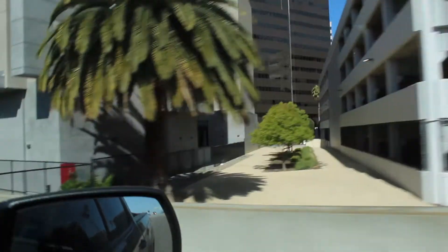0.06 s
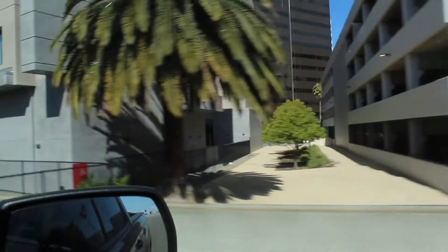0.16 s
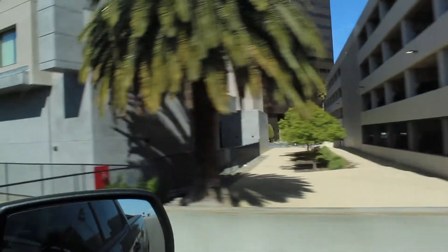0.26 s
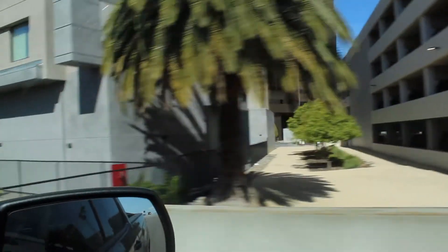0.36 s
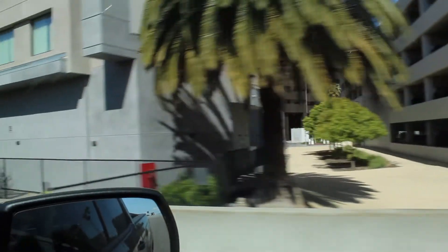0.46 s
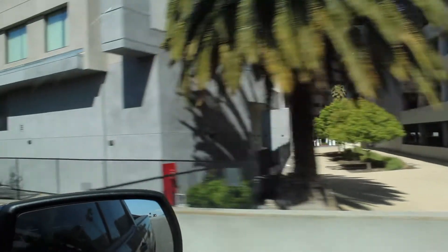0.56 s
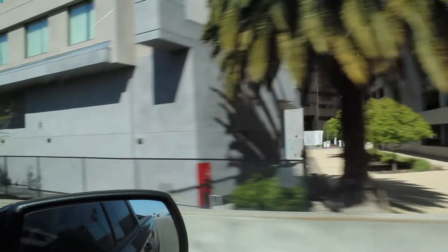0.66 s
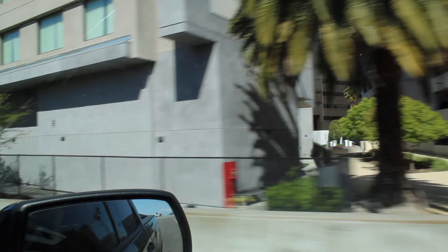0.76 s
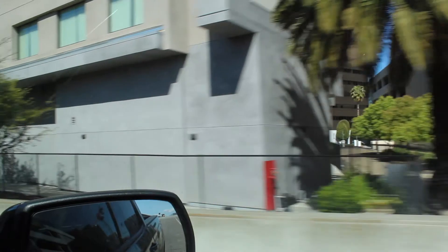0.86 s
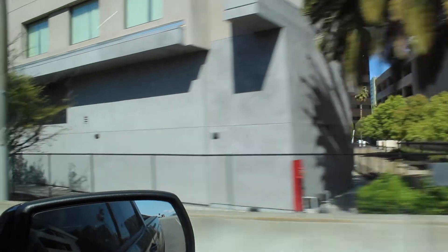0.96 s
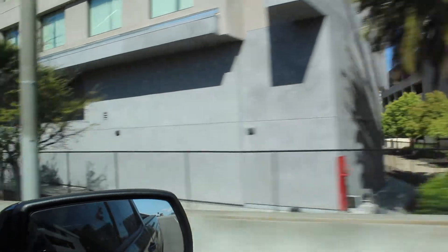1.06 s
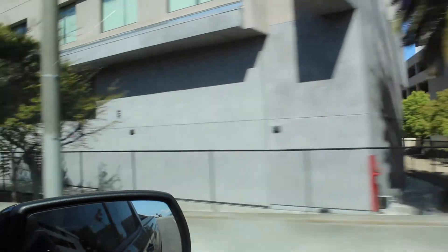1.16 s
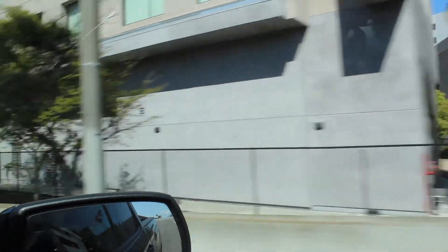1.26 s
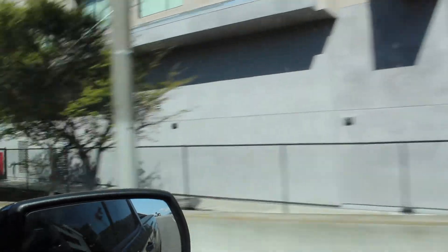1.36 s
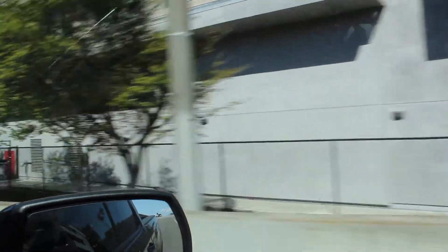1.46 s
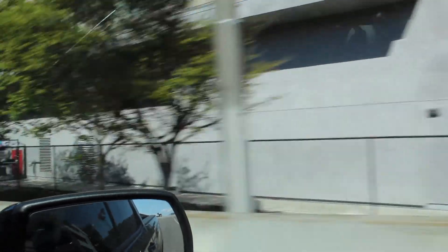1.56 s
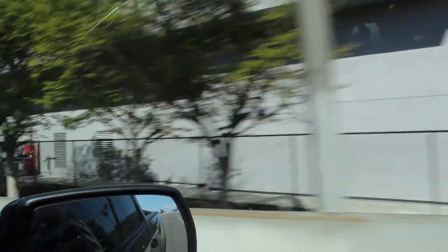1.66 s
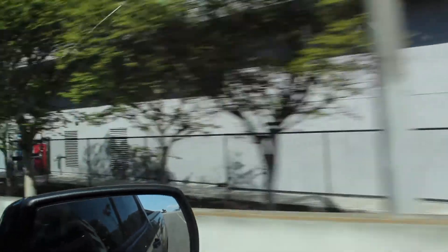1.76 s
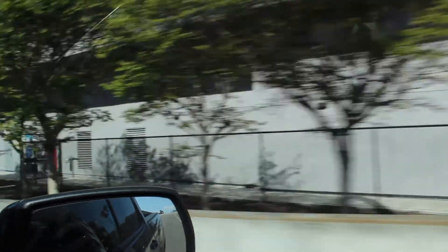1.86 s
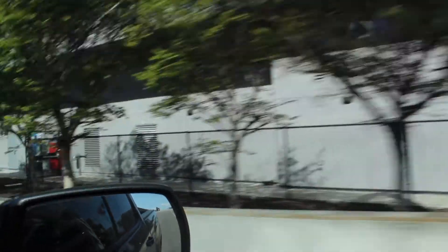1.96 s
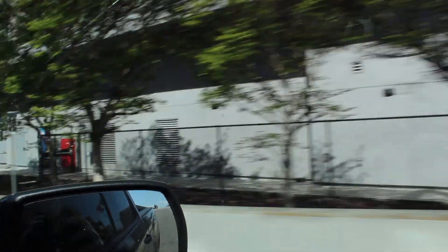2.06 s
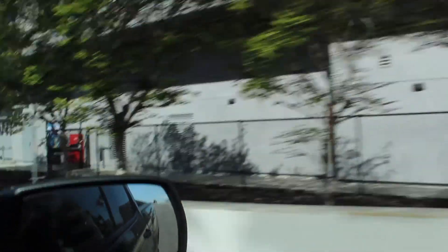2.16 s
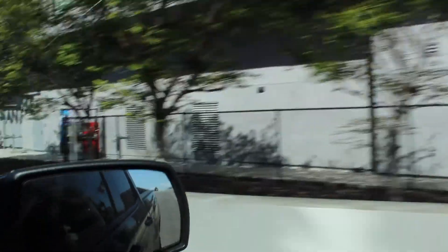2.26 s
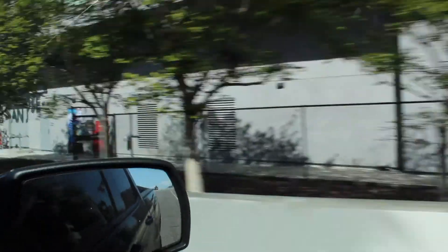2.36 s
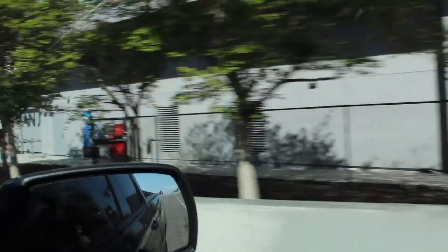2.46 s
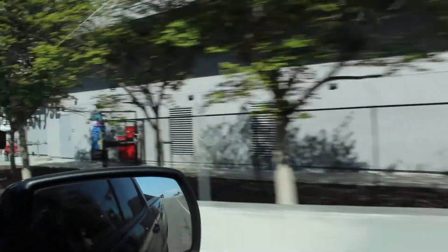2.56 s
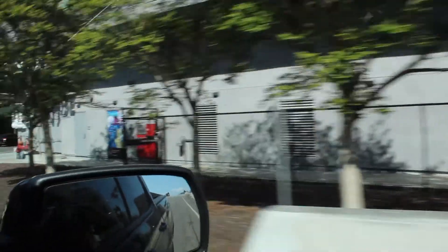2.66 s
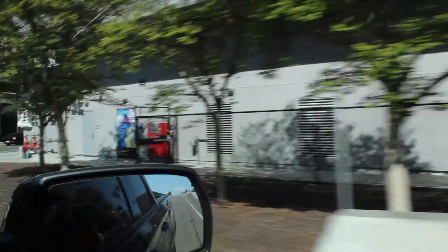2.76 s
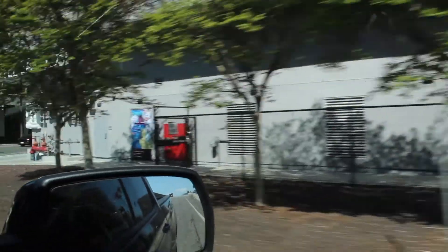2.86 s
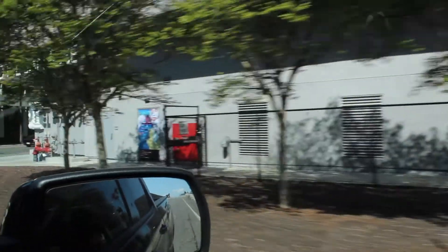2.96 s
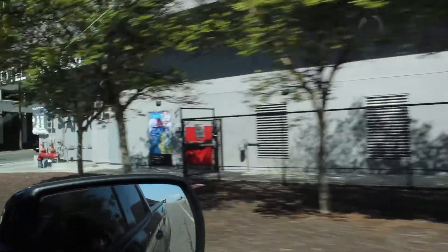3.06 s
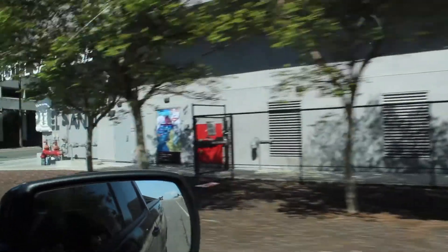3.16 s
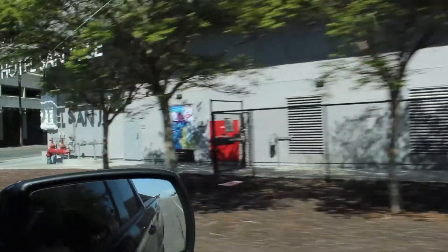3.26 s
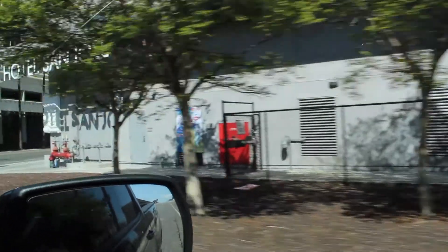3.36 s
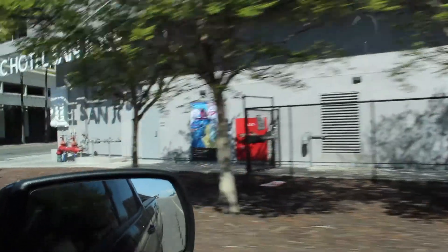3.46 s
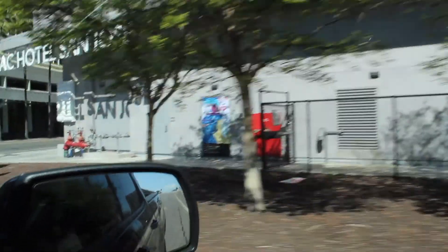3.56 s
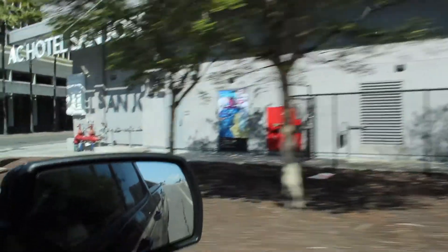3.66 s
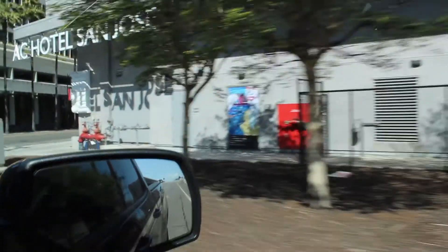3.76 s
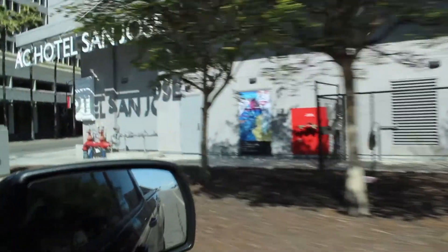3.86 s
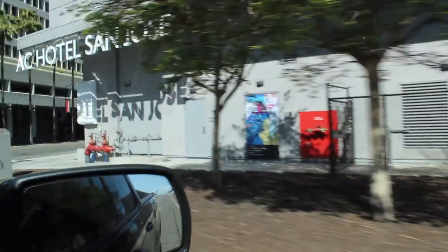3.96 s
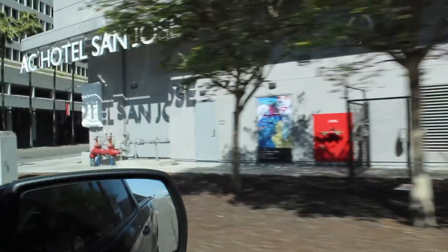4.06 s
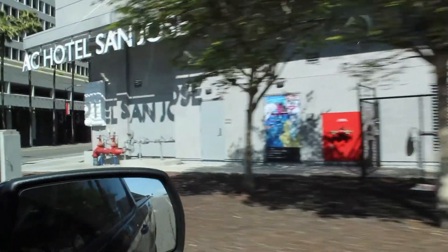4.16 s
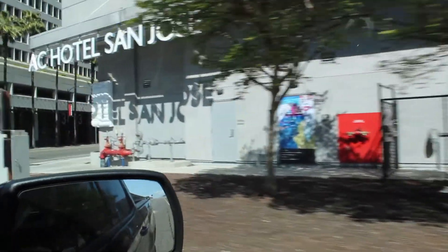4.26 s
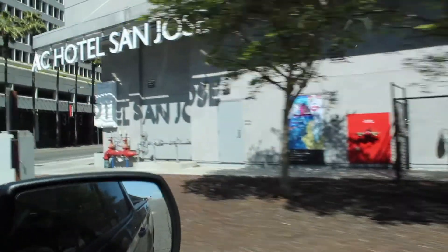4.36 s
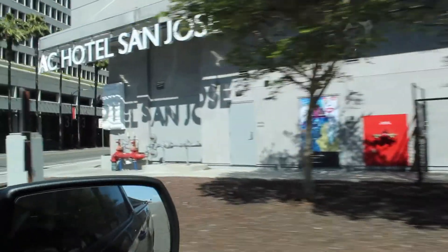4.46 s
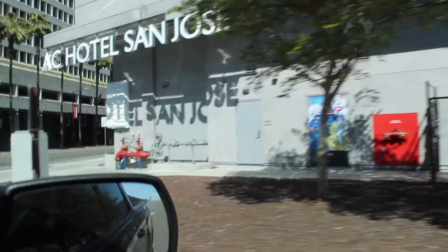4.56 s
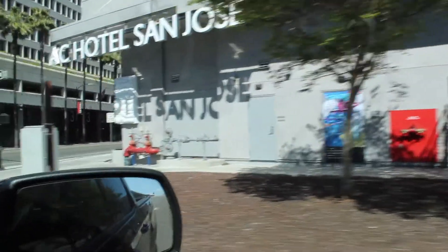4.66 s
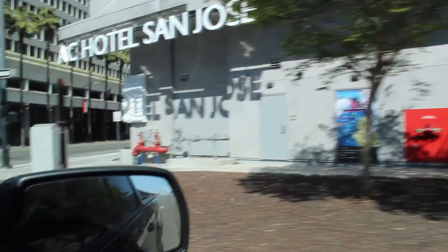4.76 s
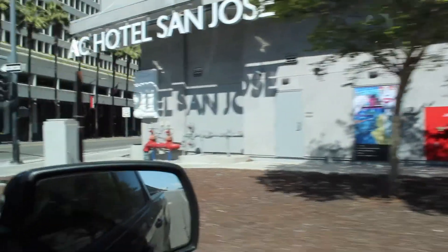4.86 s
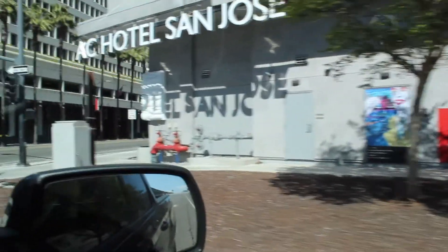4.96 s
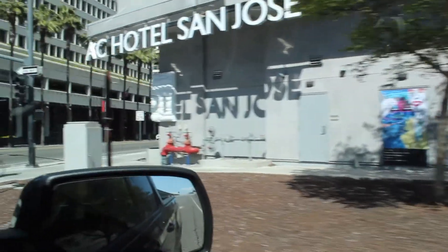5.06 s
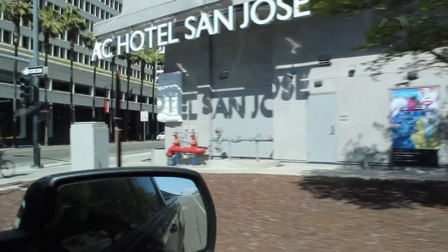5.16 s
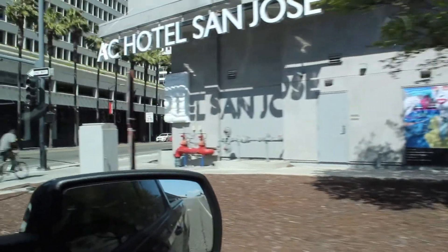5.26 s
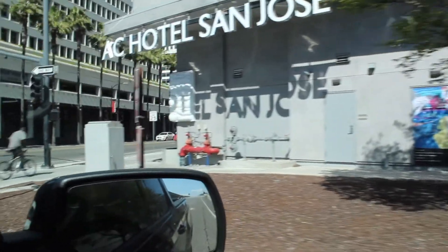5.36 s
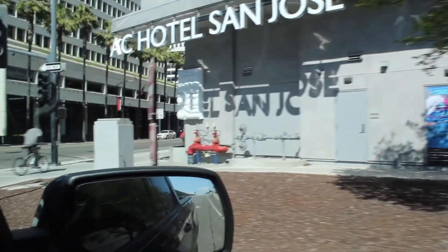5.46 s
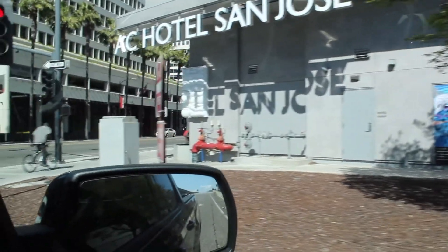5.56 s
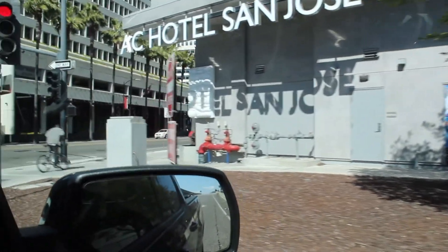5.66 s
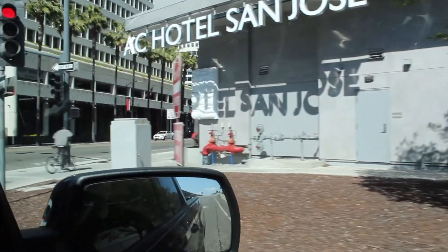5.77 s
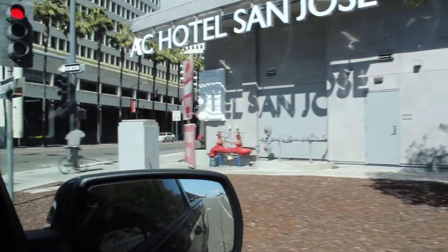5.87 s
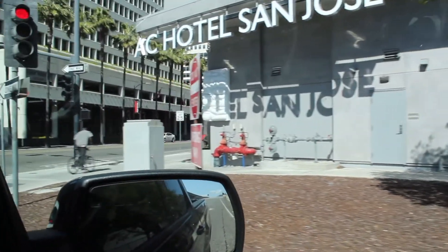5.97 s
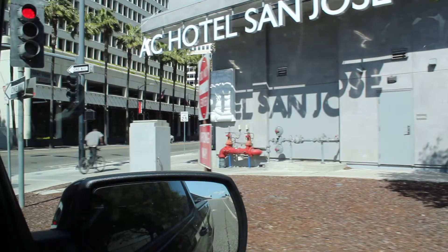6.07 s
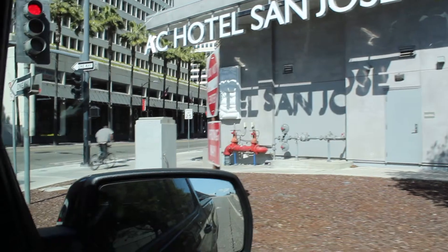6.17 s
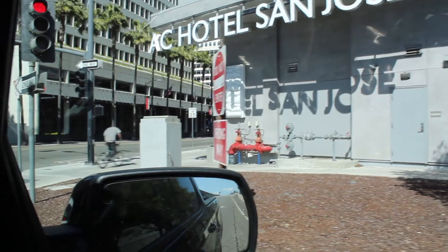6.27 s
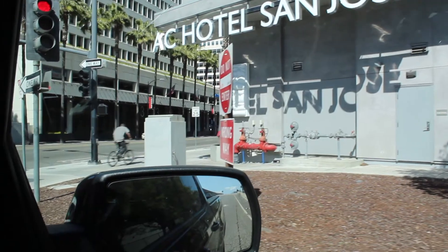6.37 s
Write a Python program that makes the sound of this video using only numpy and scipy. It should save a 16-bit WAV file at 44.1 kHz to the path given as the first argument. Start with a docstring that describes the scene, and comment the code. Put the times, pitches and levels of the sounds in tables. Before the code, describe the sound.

The sound is heard inside a closed car slowing on a city street, from beside the side window. It opens with a deep, booming road rumble, soft thumps from bumps and a muffled tyre roar, over a steady rush of air vents and a low engine hum. Light brushes on plastic come in the first half second, and faint trim ticks are scattered through the first five seconds. A small knock falls at 0.8 seconds, and a soft tyre hiss swells and passes around 1.3. Hard plastic snaps sharply at 2.4. A low drone swells around 3 seconds, with a knock on a trim panel. A lighter knock follows at 3.9 and a quick double click at 4.1. The rumble then ebbs as the car slows to a crawl, leaving mostly hum and vents. A faint, brief brake whine sounds at about 6 seconds.

```python
"""Inside a car that slows down on a city street, windows shut.
The road forces the body and the cabin air to vibrate in their normal modes: a low boom that ebbs with
the roar of the tyres, leaving the engine's harmonic hum and the rushing air vents. Close by, something
brushes lightly on plastic, and plastic parts tick, knock, snap and click in damped free vibration.
Just before the stop, friction draws a faint whine from the brakes."""
import sys
import numpy as np
from scipy import signal
from scipy.fft import rfft, irfft, next_fast_len
from scipy.io import wavfile
from scipy.ndimage import uniform_filter1d

SR = 44100
rng = np.random.default_rng(int(sys.argv[2]) if len(sys.argv) > 2 else 0)


def materialize(psi):
    """Save the field psi as 16-bit PCM at rate SR to the path in sys.argv[1].

    A 1-D psi becomes a single channel; in a 2-D psi each row is a channel.
    """
    bounded = np.clip(np.atleast_2d(psi).T, -1, 1)
    quanta = np.round(bounded * 32767).astype(np.int16)
    wavfile.write(sys.argv[1], SR, quanta)


N = 282945
TIME = np.arange(N) / SR

# the slowing of the car: time_s, speed_ratio (to the starting speed)
CAR_SPEED = [(0, 0.98), (1.2, 0.86), (2, 0.75), (3.25, 0.55), (4, 0.38), (5, 0.27), (5.55, .2),
             (6.42, 0.061)]
# bumps; a long one heaves the body, a short one booms in the cabin: time_s, level_db, centre_hz
ROAD_BUMPS = [(0.11, -14.5, 38), (0.32, -12.5, 46.5), (0.48, -22, 38), (0.71, -25, 40), (0.93, -21, 70),
              (1.359, -17.5, 124), (1.429, -16.5, 38), (1.559, -18.5, 76), (1.66, -22, 38.2),
              (1.921, -17, 38), (2.04, -13.5, 38.2), (2.26, -17, 50.3), (2.47, -25, 45), (3.02, -23.5, 145),
              (3.33, -19, 42), (3.51, -20, 45), (3.64, -19, 41.6), (3.88, -25, 140), (4.10, -19.5, 64.4),
              (4.44, -20, 55.5), (4.90, -30.5, 42), (5.12, -36.5, 75), (5.47, -29, 42)]
# modes of the body on its springs and mounts: pitch_hz, width_hz, gain_db
SUSPENSION_MODES = [(24.1, 10, -5.5), (31.4, 3.6, -12.5), (41.2, 11.8, 3.5)]
# modes of the cabin air: pitch_hz, width_hz, fast_gain_db, crawling_gain_db
AIR_MODES = [(70.8, 11, -11.5, -15), (86.4, 13.5, -4, -5.5), (113.4, 24.7, -4, -2), (137.4, 27.3, -0.5, -5),
             (158.6, 22.5, -12.5, -8.5), (184.6, 35, -6, -7), (242.1, 52.7, -6.5, -11.5)]
# brief dips of the rumble and drone: middle_s, half_length_s, gain_db
RUMBLE_DIPS = [(1.16, 0.027, -1.5), (2.4, .012, -3.5), (2.55, 0.014, -5), (2.67, 0.018, -5.5),
               (3.406, 0.019, -7), (3.72, 0.015, -5.5), (5.152, 0.018, -4.5), (5.798, .03, -2.5)]
# the tyres' drone, swelling as the car slows through a resonance: time_s, level_db
DRONE_LEVELS = [(0, -44.5), (2.0, -35.5), (2.35, -31.5), (2.8, -21.5), (3.2, -21), (3.6, -32), (4.3, -32.5),
                (5.2, -62)]
# spectrum of tyre roar through doors and glass: frequency_hz, density_db
ROAR_SPECTRUM = [(100, -20.5), (290, 6.5), (370, 5), (470, 4), (590, -2), (730, 0), (930, -12),
                 (1150, -6.5), (1500, -26), (2000, -26.5), (2700, -29), (3450, -30.5), (3750, -37.5),
                 (5000, -39), (12000, -60.5)]
# stretches of coarse asphalt: middle_s, half_length_s, gain_db
COARSE_ASPHALT = [(0.074, 0.019, 3.5), (0.247, 0.027, 5.5), (0.79, 0.076, 5), (1.055, 0.036, 4.5)]
# harmonics of the engine's firing rate: harmonic_number, level_db
ENGINE_HARMONICS = [(1, -49), (2, -46.5), (3, -46.5), (4, -41.5), (5, -49), (6, -44)]
# spectrum of the air leaving the vents: frequency_hz, density_db
VENT_SPECTRUM = [(200, 0.5), (500, 3), (640, 0), (900, 1), (1500, -3.5), (2100, -3), (2700, -11.5),
                 (3450, -13), (3750, -19), (5000, -23.5), (6500, -29), (10000, -33.5), (12000, -40),
                 (15500, -46)]
# resonances of the air ducts: pitch_hz, width_hz, gain_db
DUCT_RESONANCES = [(296.5, 46, -51.5), (433, 24, -61), (509, 82, -51.5), (718, 73, -55), (1112, 180, -50),
                   (1779, 47, -62), (1957, 34, -64), (3230, 650, -63.5), (4625, 180, -73.5)]
# thin whistles of the blower: pitch_hz, width_hz, gain_db
BLOWER_WHISTLES = [(1086.5, 24, -56.5), (1786, 19, -65), (2066, 18, -59.5), (2826, 22, -68)]
# notes the cabin holds for a moment: middle_s, half_length_s, pitch_hz, level_db
BOOM_NOTES = [(0.117, .09, 195.2, -26), (0.244, .05, 85.2, -22), (.25, 0.037, 283.5, -27),
              (0.426, 0.062, 81.2, -24), (0.512, 0.1, 135.7, -19.5), (0.806, 0.057, 146.8, -22),
              (.95, .05, 82.4, -17), (1.268, 0.091, 140.9, -23.5), (2.302, 0.17, 70.4, -26),
              (2.87, 0.07, 78.2, -23.5), (3.274, 0.032, 137.2, -21.5), (4.83, .06, 76, -33.5),
              (5.4, 0.089, 72.1, -39)]
# short strokes on the plastic: peak_s, level_db, half_length_s
BRUSH_STROKES = [(0.132, -42.5, 0.0043), (.150, -56, .006), (0.32, -59, .004), (0.342, -48.5, 0.0038),
                 (0.366, -48, 0.0061), (0.389, -43, 0.0036), (.399, -56, .006), (2.073, -57.5, 0.012),
                 (3.905, -59.5, 0.04), (4.218, -64.5, 0.16), (4.773, -65, 0.09), (4.974, -67, .07),
                 (5.32, -72, .08), (5.66, -69, .08)]
# spectrum of their friction: frequency_hz, density_db
BRUSH_SPECTRUM = [(2000, -6), (4500, -1), (6500, -2), (7500, 0.5), (8600, 0), (10500, -0.5), (12500, -6),
                  (14500, -6), (16000, -18)]
# touches of loose trim as the car shakes: start_s, force_db
TRIM_TOUCHES = [(.497, -55), (.546, -61), (.634, -52), (.87, -61), (1.067, -56), (1.315, -62), (1.417, -58),
                (1.968, -59), (2.022, -59), (2.061, -52), (2.074, -52), (2.10, -58), (2.128, -57),
                (2.53, -53), (3.323, -53), (3.808, -58), (4.802, -57)]
# spectrum of tyre hiss reflected by a roadside wall: frequency_hz, density_db
WALL_SPECTRUM = [(1300, 1), (2200, 6.5), (3300, -9), (5500, -18.5), (12000, -40)]
# blows on a trim panel: start_s, force_db
PANEL_HITS = [(.845, -32.5), (3.0181, -24), (3.9132, -29.5)]
# modes of the panel: pitch_hz, gain_db, t60_s
PANEL_MODES = [(1100, 2, .014), (1780, -4, .013), (2000, -4, .013), (2500, -14, .02), (3000, -8.5, 0.012),
               (3260, -15, .012), (3670, -8.5, 0.011), (4750, -18, .008), (5850, -19, .008),
               (7460, -23, .01), (9400, -16, .004), (12260, -27, .008)]
# the blow on a hard plastic shell: start_s, force_db
SHELL_HITS = [(2.3799, -20)]
# modes of the shell: pitch_hz, gain_db, t60_s
SHELL_MODES = [(970, -2, 0.014), (1175, 0, .017), (1430, -2, 0.018), (1780, -2, 0.02), (2010, -3, 0.016),
               (2230, -20, .012), (3250, -13, .008), (4250, -13, 0.012), (4530, -12, 0.014),
               (4950, -22, .012), (5560, -8, 0.0094), (6350, -22, .008), (7150, -21, .008),
               (8250, -13, .008), (8700, -9.5, 0.0062), (9450, -11, 0.0054), (10250, -9, .006),
               (12200, -23, .005), (13800, -15, .004)]
# impacts of a small plastic catch: start_s, force_db
CATCH_HITS = [(4.0960, -59), (4.1189, -22), (4.1283, -32), (4.135, -52)]
# modes of the catch, also used for the loose trim: pitch_hz, gain_db, t60_s
CATCH_MODES = [(2040, -12, 0.029), (2800, -15, 0.0103), (3500, -15, 0.017), (4160, -11.5, 0.024),
               (4900, -11.5, .024), (5700, -7, .013), (6380, -11, .016), (7000, -12, .01),
               (7500, -14.5, 0.023), (8100, -10.5, 0.007), (8560, 0, 0.0099), (9300, -4, 0.0064),
               (10700, 0.5, 0.0055), (11400, -10, 0.014), (12300, -12, .005), (13900, -4, .005)]


def from_db(db):
    """Amplitude grows tenfold with every 20 dB."""
    return 10 ** (np.asarray(db) / 20)


def unit_rms(x):
    """Normalisation to a mean power of 1."""
    return x / np.sqrt(np.mean(x ** 2) + 1e-20)


def in_time(curve):
    """Linear interpolation of a curve at every sample."""
    return np.interp(TIME, *np.transpose(curve))


def swell(middle_s, half_s):
    """A Gaussian envelope of height 1 and standard deviation half_s."""
    return np.exp(-.5 * np.minimum(((TIME - middle_s) / half_s) ** 2, 50))


def drift(rate_hz):
    """Random modulation: a line through Gaussian values; rms 1."""
    knots = rng.standard_normal(int(TIME[-1] * rate_hz) + 2)
    return unit_rms(np.interp(TIME * rate_hz, np.arange(len(knots)), knots))


def coloured_noise(spectrum):
    """Spectral shaping of white noise, falling away below the spectrum's first point; rms 1."""
    size = next_fast_len(N)
    hz = np.arange(1, size // 2 + 2) * SR / size
    points_hz, points_db = np.transpose(spectrum)
    gain = from_db(np.interp(np.log(hz), np.log(points_hz), points_db))
    gain /= 1 + (points_hz[0] / hz / 2) ** 4
    return unit_rms(irfft(rfft(rng.standard_normal(size)) * gain, size)[:N])


def shaken_mode(hz, width_hz):
    """Steady-state response of a steep-sided resonator to a random force; rms 1."""
    radius = np.exp(-np.pi * width_hz / SR)
    section = [1 - radius, 0, radius - 1, 1, -2 * radius * np.cos(2 * np.pi * hz / SR), radius ** 2]
    return unit_rms(signal.sosfilt([section, section], rng.standard_normal(N + SR))[SR:])


def evened(x, span_s):
    """Division by the running rms removes slow swells and keeps the fast flutter."""
    size = int(span_s * SR)
    power = uniform_filter1d(uniform_filter1d(x * x, size), size)
    return x / np.sqrt(power + 1e-12)


def ring(force, hz, t60_s):
    """A damped oscillator: a unit impulse starts a decaying sine of height 1."""
    radius, angle = from_db(-60 / (t60_s * SR)), 2 * np.pi * hz / SR
    return signal.lfilter([0, np.sin(angle)], [1, -2 * radius * np.cos(angle), radius ** 2], force + 1e-18)


def struck(hits, modes, band_hz, scatter_db, scatter_s, spread_cycles=1.5):
    """Modal superposition: hits ring a part that radiates in band_hz; near surfaces scatter the sound."""
    force, age = np.zeros(N), TIME[:SR // 20]
    for start_s, db in hits:
        contact = from_db(scatter_db) * rng.standard_normal(len(age)) * np.exp(-age / scatter_s)
        contact[0] += 1
        start = round(start_s * SR)
        force[start:start + len(age)] += from_db(db) * contact
    ringing = 0
    for hz, db, t60_s in modes:
        # the blow takes a moment to spread, so lower modes tend to start later
        delay = round(rng.random() * spread_cycles * SR / hz)
        ringing += from_db(db) * ring(np.roll(force, delay), hz, t60_s)
    return signal.sosfilt(signal.butter(4, band_hz, "band", fs=SR, output="sos"), ringing)


def rolling(start_db, db_per_halving):
    """The amplitude of rolling noise follows a power law of speed."""
    return from_db(start_db + db_per_halving * np.log2(in_time(CAR_SPEED)))


def jolts(hz, rise_s=0.046, hold_s=0.015, fall_s=0.031, spread_octaves=0.42):
    """Bumps add in power, each exciting a part tuned to hz the more, the nearer its centre lies."""
    power = 0
    for time_s, db, centre_hz in ROAD_BUMPS:
        age = TIME - time_s
        outside_hold = np.minimum(age, 0) / rise_s - np.maximum(age - hold_s, 0) / fall_s
        coupling = np.exp(-.5 * (np.log2(hz / centre_hz) / spread_octaves) ** 2)
        power += (from_db(db) * coupling) ** 2 * np.exp(-np.minimum(outside_hold ** 2, 50))
    return np.sqrt(power)


def road_rumble(body_hz=40, thud_hz=136, idle_db=-32.5):
    """Forced vibration: rolling and bumps drive body and cabin air; the idling engine sustains the boom."""
    body_drive = np.hypot(rolling(start_db=-20, db_per_halving=7), jolts(body_hz))
    cabin_drive = np.hypot(rolling(start_db=-16, db_per_halving=8.5), from_db(idle_db))
    body = sum(from_db(db) * shaken_mode(hz, width) for hz, width, db in SUSPENSION_MODES)
    cabin = 0
    for hz, width, fast_db, crawling_db in AIR_MODES:
        gain = from_db(np.linspace(fast_db, crawling_db, N))
        cabin += gain * evened(shaken_mode(hz, width), span_s=0.34)
    thuds = jolts(thud_hz) * evened(shaken_mode(thud_hz, width_hz=16), span_s=0.14)
    return body_drive * evened(body, span_s=0.077) + cabin_drive * evened(cabin, span_s=0.11) + thuds


def wheel_drone(hz=77, width_hz=20):
    """Resonance: the slowing wheels pass through a low mode, which bumps also set thumping."""
    drive = np.hypot(from_db(in_time(DRONE_LEVELS)), jolts(hz))
    return drive * evened(shaken_mode(hz, width_hz), span_s=0.074)


def cabin_null(x, hz=54, q=4.6):
    """Antiresonance: between the body's bounce and the first air mode the cabin passes little."""
    return signal.lfilter(*signal.iirnotch(hz, q, fs=SR), x)


def tyre_roar(flutter_db=0.07):
    """Roughness excitation: tread on asphalt roars, more on coarse stretches and less at a crawl."""
    coarse_db = sum(db * swell(s, half) for s, half, db in COARSE_ASPHALT)
    surface = from_db(coarse_db - flutter_db * drift(rate_hz=13))
    return rolling(start_db=-32.5, db_per_halving=9) * surface * coloured_noise(ROAR_SPECTRUM)


def engine(idle_hz=37.54, rise_hz=4.3, wander_ratio=0.01483, rough_db=1.5):
    """A harmonic series on an uneven firing rate, which sinks towards idle as the car slows."""
    firing_hz = (idle_hz + rise_hz * in_time(CAR_SPEED)) * (1 + wander_ratio * drift(rate_hz=9))
    phase = 2 * np.pi * np.cumsum(firing_hz) / SR
    hum = 0
    for harmonic, db in ENGINE_HARMONICS:
        amplitude = np.sqrt(2) * from_db(db + rough_db * drift(rate_hz=17))
        hum += amplitude * np.sin(harmonic * phase + 2 * np.pi * rng.random())
    return hum


def vents(rush_gain_db=-41, fade_db_per_s=0.7633, end_gain_db=-1.16):
    """Broadband flow noise with hollow duct resonances and thin blower whistles, all easing slightly."""
    ducts = sum(from_db(db) * shaken_mode(hz, width) for hz, width, db in DUCT_RESONANCES)
    whistles = sum(from_db(db) * evened(shaken_mode(hz, width), span_s=0.13)
                   for hz, width, db in BLOWER_WHISTLES)
    rush = from_db(rush_gain_db) * coloured_noise(VENT_SPECTRUM)
    fade = from_db(end_gain_db + fade_db_per_s * (TIME[-1] - TIME))
    return (rush + ducts + whistles) * fade


def cabin_booms(width_hz=5.1):
    """Narrow resonance: shaken by the wheels, the cabin briefly holds nearly pure low notes."""
    return sum(from_db(db) * swell(s, half) * evened(shaken_mode(hz, width_hz), span_s=0.039)
               for s, half, hz, db in BOOM_NOTES)


def brushes(grain_db=1.5):
    """Sliding friction: light contact makes a fine, grainy hiss that swells and dies with each stroke."""
    strokes = sum(from_db(db) * swell(s, half) for s, db, half in BRUSH_STROKES)
    grain = unit_rms(from_db(grain_db * drift(rate_hz=700)))
    return strokes * grain * coloured_noise(BRUSH_SPECTRUM)


def trim_ticks():
    """Light impacts of loose plastic sound only its highest modes."""
    return struck(TRIM_TOUCHES, CATCH_MODES, band_hz=(9500, 15000), scatter_db=-22, scatter_s=.002)


def wall_hiss(level_db=-46.5):
    """Reflection: a roadside wall returns the tyres' hiss as the car passes."""
    return from_db(level_db) * swell(middle_s=1.28, half_s=0.36) * coloured_noise(WALL_SPECTRUM)


def panel_knocks(repeat_s=0.0043, repeat_db=-6):
    """Heavily damped modes give a trim panel its woody knock; each blow sounds again, fainter, a moment later."""
    hits = PANEL_HITS + [(s + repeat_s, db + repeat_db) for s, db in PANEL_HITS]
    return struck(hits, PANEL_MODES, band_hz=(900, 11500), scatter_db=-28, scatter_s=0.0061)


def shell_snap():
    """Impulse response: a hard plastic shell snaps once and rings in its inharmonic modes."""
    return struck(SHELL_HITS, SHELL_MODES, band_hz=(845, 13000), scatter_db=-31, scatter_s=.0022)


def catch_clicks():
    """Free vibration: a small catch rings in high modes as it clicks and settles."""
    return struck(CATCH_HITS, CATCH_MODES, band_hz=(1800, 13300), scatter_db=-34, scatter_s=0.0024)


def brakes(pitch_hz=1788, width_hz=17, level_db=-55):
    """Friction-excited vibration: pads rubbing on the discs give a brief, faint whine."""
    whine = evened(shaken_mode(pitch_hz, width_hz), span_s=.05)
    return from_db(level_db) * swell(middle_s=6.08, half_s=0.14) * whine


def scene():
    """Superposition: all the sounds add at one microphone by the side window."""
    dips = from_db(sum(db * swell(s, half) for s, half, db in RUMBLE_DIPS))
    rumble = dips * cabin_null(road_rumble() + wheel_drone())
    car = rumble + cabin_booms() + tyre_roar() + wall_hiss() + engine() + brakes() + vents()
    plastic = shell_snap() + panel_knocks() + catch_clicks() + trim_ticks() + brushes()
    return (car + plastic)[None]


def record(dry, fade_in_s=.004, low_hz=17, top_hz=15600):
    """Band limiting: after a brief fade-in, the microphone drops the deepest bass and the top is cut."""
    eased_in = dry * np.minimum(TIME / fade_in_s, 1)
    thinned = signal.sosfilt(signal.butter(2, low_hz, "high", fs=SR, output="sos"), eased_in)
    return signal.sosfilt(signal.ellip(10, .1, 80, top_hz, fs=SR, output="sos"), thinned)


dry = scene()
out = record(dry)
materialize(out)
```